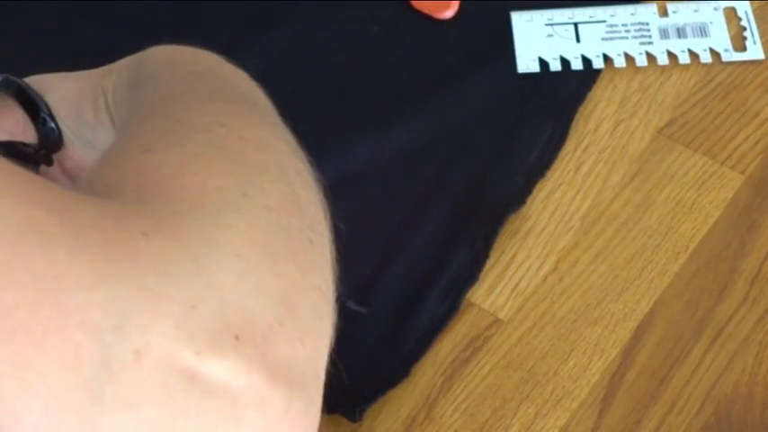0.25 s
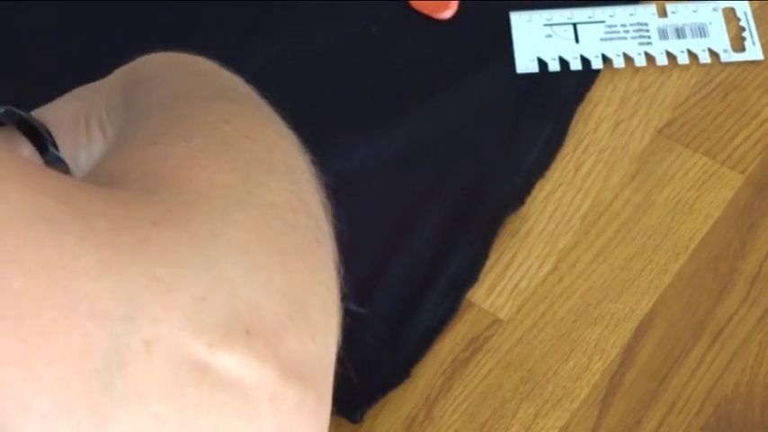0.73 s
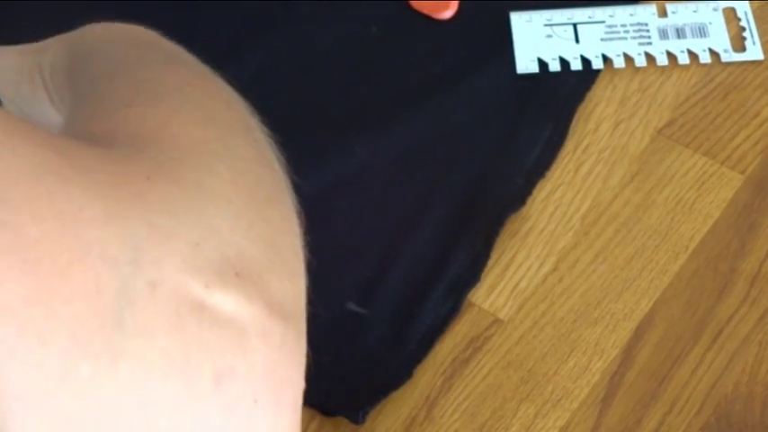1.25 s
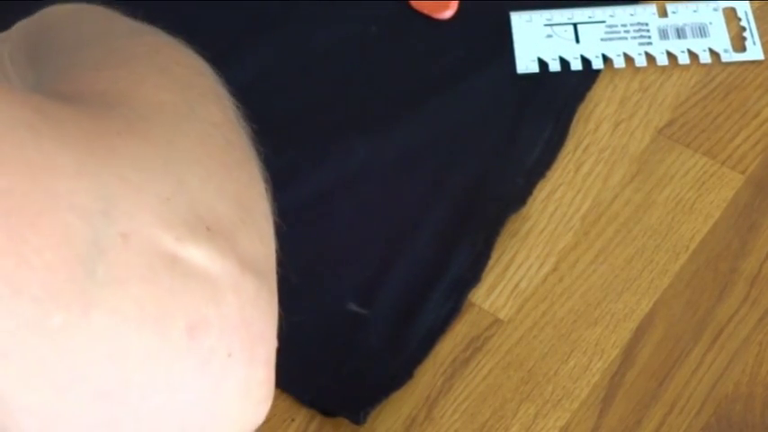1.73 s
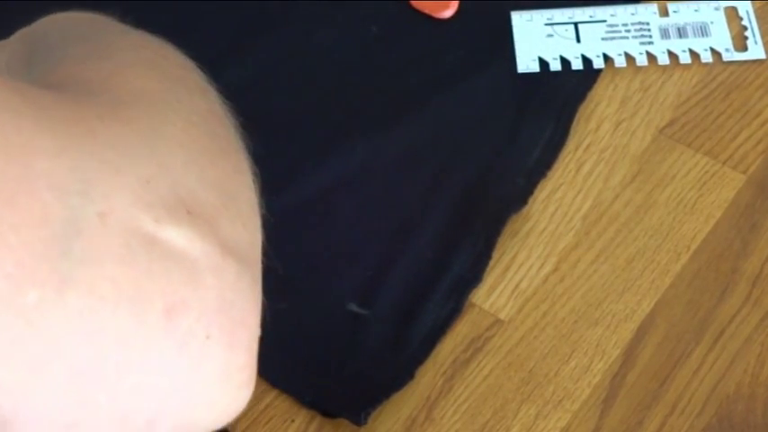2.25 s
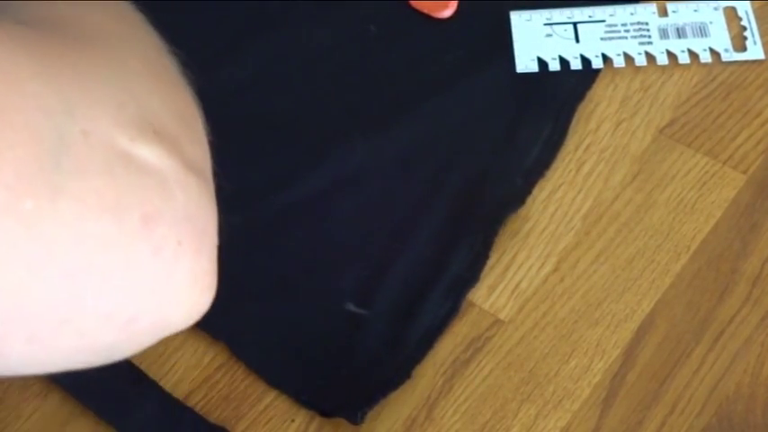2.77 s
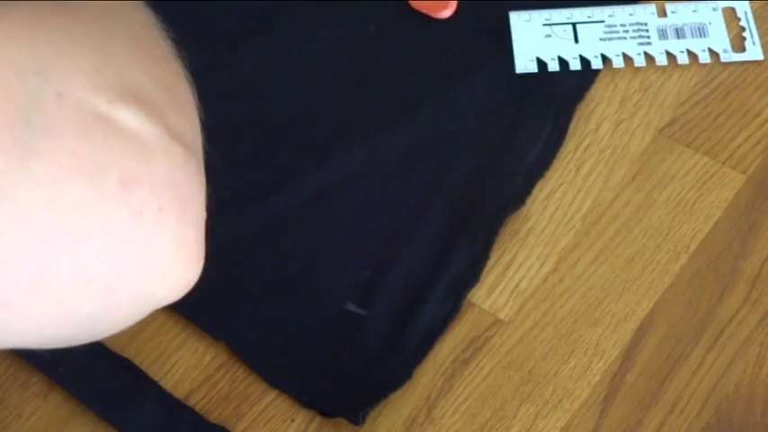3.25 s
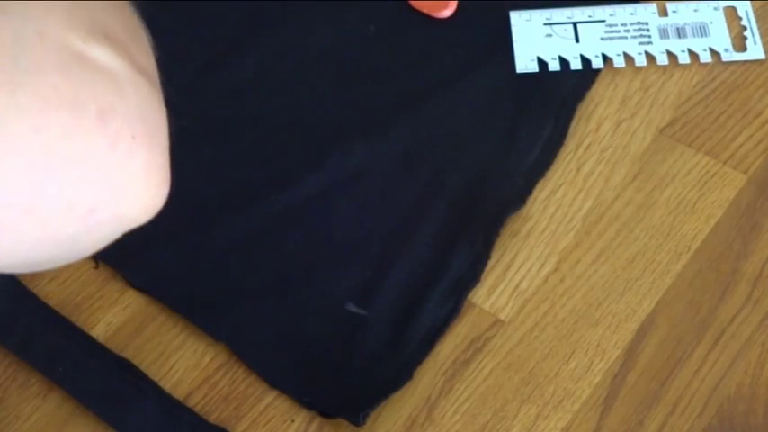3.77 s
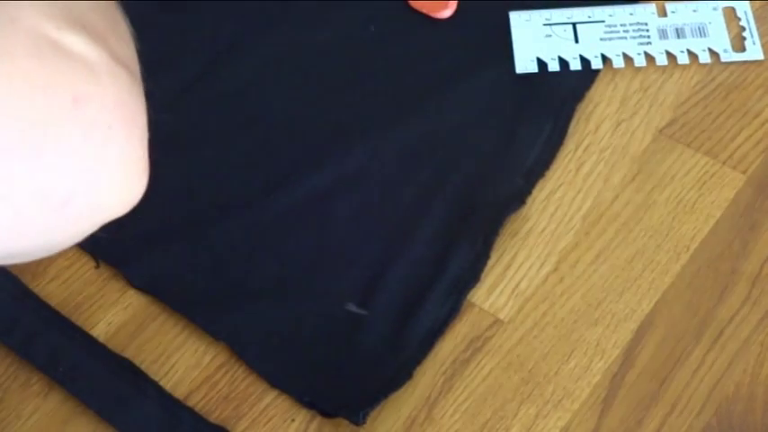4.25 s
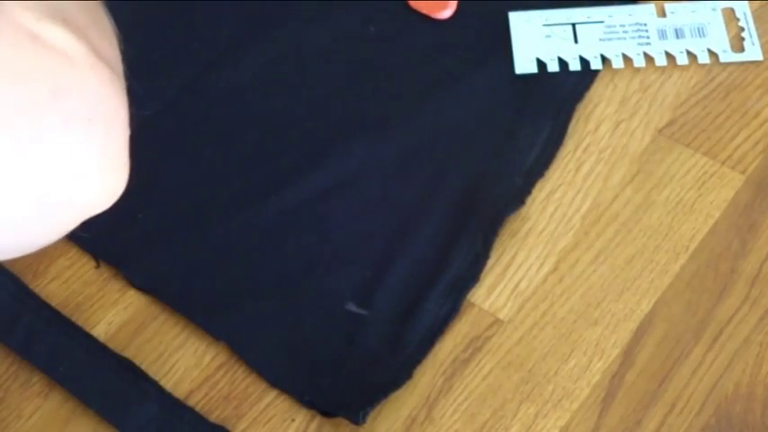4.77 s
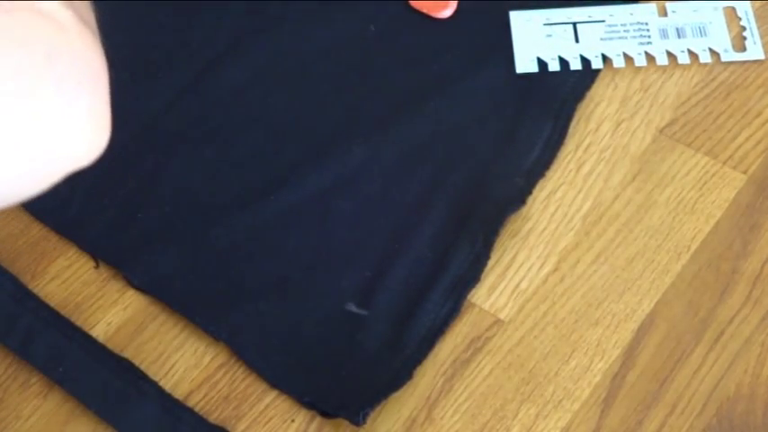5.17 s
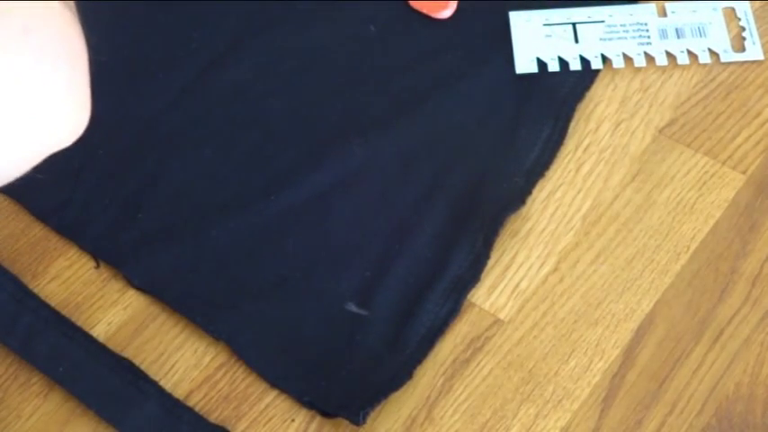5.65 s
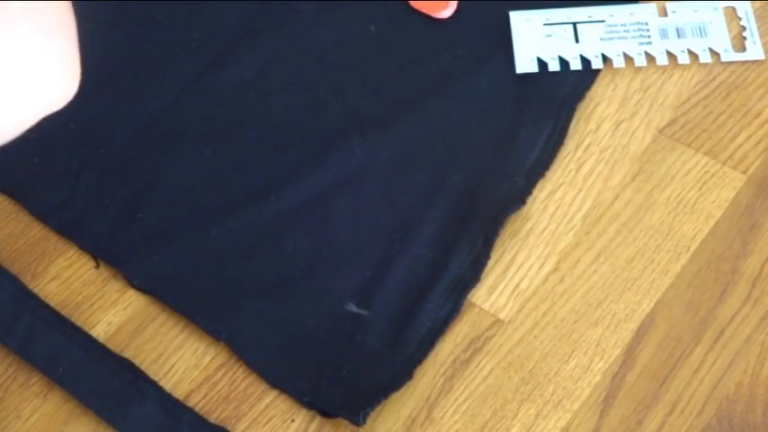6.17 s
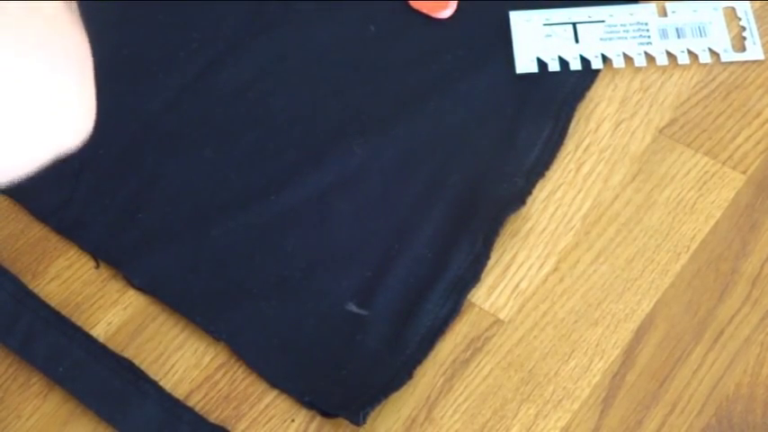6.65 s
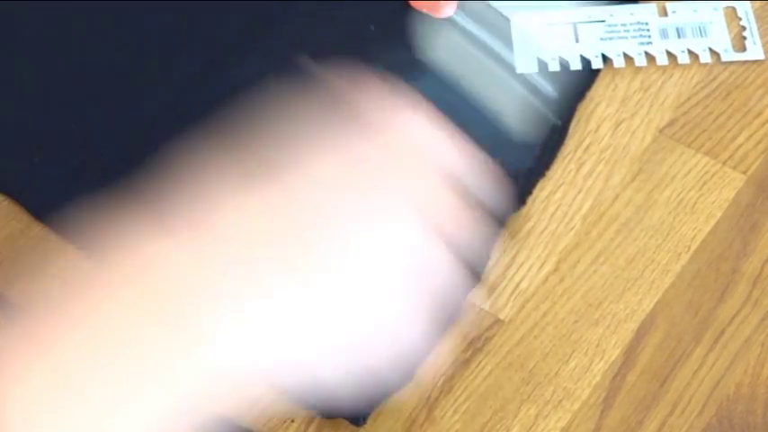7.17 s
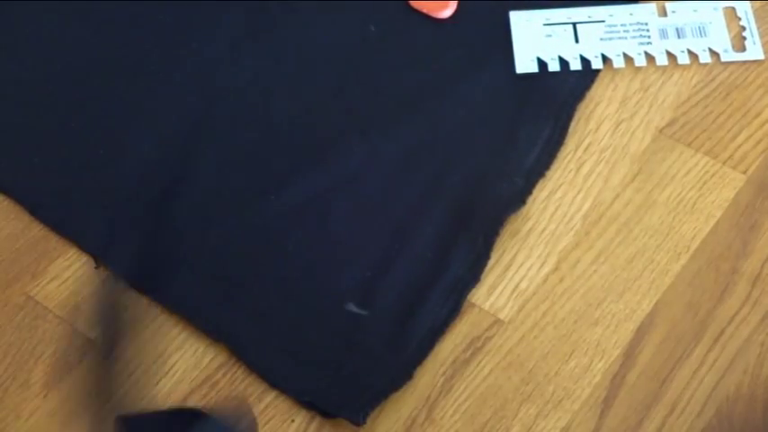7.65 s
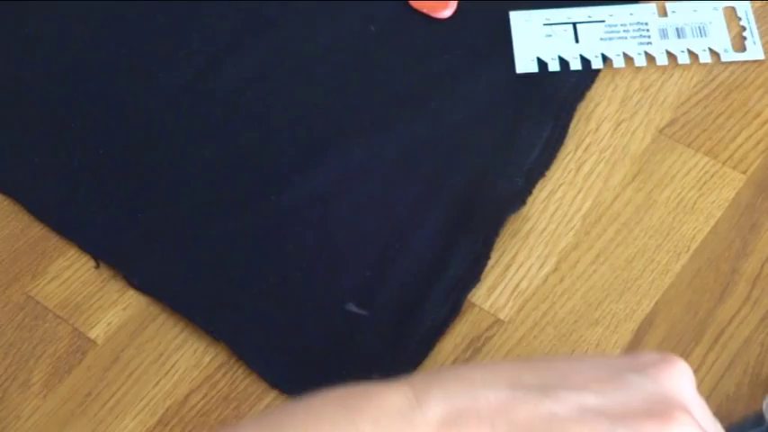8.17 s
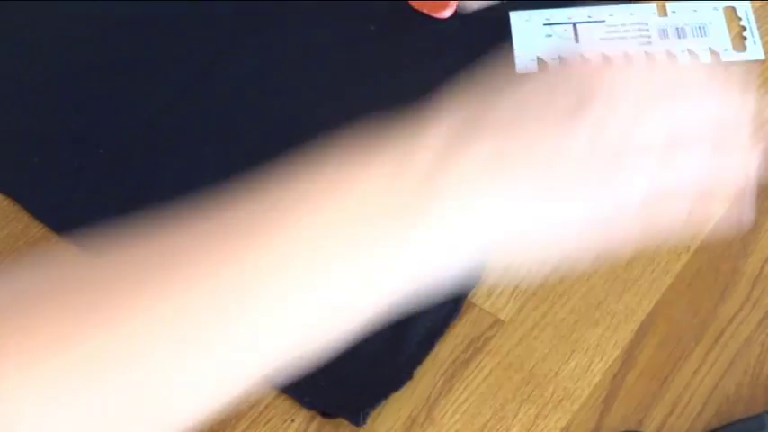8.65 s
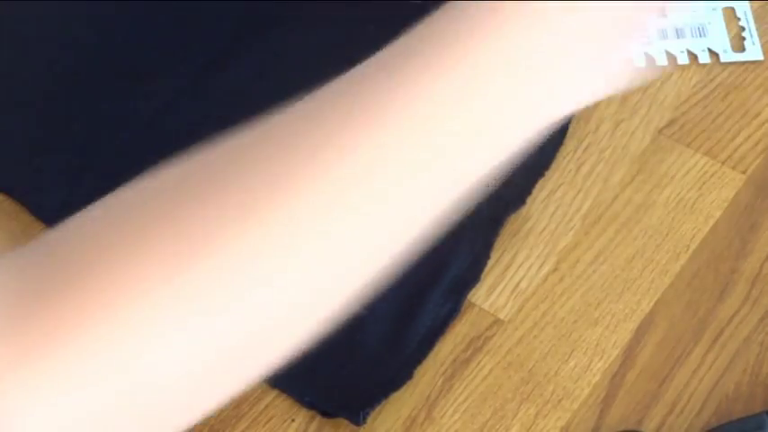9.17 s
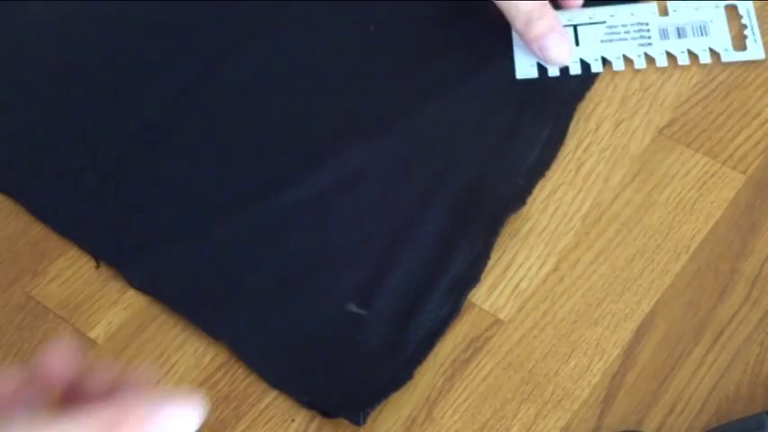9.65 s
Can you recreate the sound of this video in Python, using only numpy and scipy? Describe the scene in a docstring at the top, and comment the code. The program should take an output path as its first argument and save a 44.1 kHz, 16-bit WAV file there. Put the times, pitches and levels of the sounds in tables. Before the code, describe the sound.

A small bare room with short, bright echoes and a faint constant hush, hiss and whirr. Close to the microphone, scissors cut stretchy cloth on a wooden table. Crunching strokes, full of tiny fibre snaps and sliding steely pitches, begin at about 0.4, 1.65, 3.0, 4.2, 5.4 and 6.3 seconds; the first is longest, swelling over 0.4 seconds, the others about 0.2. Thin steel swishes fall between them, with dull wooden knocks and soft cloth fizz. At 6.6 the blades snap shut sharply, and at 6.9 cloth rustles brightly. At 7.5 the scissors clack onto the wood with a short metallic ring, followed by a lighter click and a strong cloth brush around 7.7. Heavier, booming thumps and clatter come at 8.1 and 8.5 to 8.6. A soft hand brush passes near 8.9; a rough, dragging rustle and small dry ticks follow at 9.7 to 9.9.

```python
"""Scissors cut a strip off stretchy cloth on a wooden table, six strokes, in a small bare room.
Each stroke is a swelling crunch: tiny snaps of fibres ring the blades, whose pitches glide as they close.
Between strokes bare edges swish, and throughout, blows knock the wood and cloth fizzes under the hand.
The last cut runs out of cloth and the blades snap shut; cloth rustles brightly. Then the scissors clack
down, things are shifted on the table, a hand brushes the cloth, and a rough, dragging rustle comes among
small ticks near the end. A faint hush, hiss and whirr never stop."""
import sys
import numpy as np
from scipy import signal
from scipy.io import wavfile
from scipy.ndimage import uniform_filter1d

SR = 44100
rng = np.random.default_rng(int(sys.argv[2]) if len(sys.argv) > 2 else 0)


def wrap_up_sound(samples):
    """Save the sound to the file named by the first command line argument, as 16-bit audio."""
    columns = np.atleast_2d(samples).T
    # keep every value between -1 and 1, then stretch to whole-number steps
    tamed = np.clip(columns, -1, 1)
    steps = np.round(tamed * 32767).astype(np.int16)
    wavfile.write(sys.argv[1], SR, steps)


N = 437031  # length [samples]


def amp(db):
    """Turns decibels into a factor on the sound wave."""
    return 10 ** (np.asarray(db) / 20)


def evened(x):
    """Scales a lasting sound to an average (RMS) level of 1."""
    return x / np.sqrt(np.mean(x ** 2) + 1e-20)


def burst(x):
    """Scales a short sound to the energy of 50 ms at full level."""
    return x * np.sqrt(SR / 20 / np.sum(x ** 2))


def read(points, hz):
    """Reads a curve of (frequency, value) points, evenly along musical pitch."""
    f, value = np.transpose(points)
    return np.interp(np.log(hz + 1), np.log(f + 1), value)


def add(mix, s, sound):
    """Lays a sound into the mix, starting at s seconds."""
    part = mix[max(round(s * SR), 0):][:len(sound)]
    part += sound[:len(part)]


def wander(count, size):
    """Smooth chance of unit size that changes over about `size` samples."""
    noise = rng.standard_normal(count)
    return evened(uniform_filter1d(uniform_filter1d(noise, size), size))


def colour(x, spectrum, size=4096):
    """Filters with the given spectrum, never sounding ahead of its input."""
    hz = abs(np.fft.fftfreq(size, 1 / SR))
    log_gain = np.log(amp(read(spectrum, hz)))
    # the Hilbert transform finds the phase that lets the filter respond soonest
    taps = np.fft.ifft(np.exp(np.conj(signal.hilbert(log_gain)))).real
    return signal.oaconvolve(x, taps)[:len(x)]


def resonate(x, hz, width):
    """A resonance of gain 1 that may follow a moving frequency."""
    turn = np.exp(2j * np.pi * np.cumsum(hz * np.ones(len(x))) / SR)
    r = np.exp(-np.pi * width / SR)
    # shift the pitch down to zero, smooth there, and shift it back up
    smooth = signal.lfilter([1 - r], [1, -r], x / turn)
    return 2 * (turn * smooth).real


def ring(modes, build_s=0.009, beating=0.63):
    """The modes of a struck thing build up, beat with their own echoes, and die."""
    t = np.arange(SR) / SR
    out = np.zeros(SR)
    for hz, db, t60 in modes:
        unsteady = 1 + beating * (wander(SR, size=700) + 1j * wander(SR, size=700))
        tone = np.exp(2j * np.pi * (hz * t + rng.random()))
        out += amp(db - 60 * t / t60) * (unsteady * tone).real
    return burst(-np.expm1(-t / build_s) * out)


def grains(per_s, spread_db):
    """A dense train of tiny snaps of uneven size."""
    size = amp(spread_db * np.minimum(rng.exponential(1, N), 4))
    sign = rng.choice([-1, 1], N)
    return evened(size * sign * (rng.random(N) < per_s / SR))


def swells(rows):
    """Level of a row of short rubs, each with its own rise and fall; overlaps add as energy."""
    energy, t = np.zeros(N), np.arange(-SR // 2, SR // 2) / SR
    for s, db, rise, fall in rows:
        shape = amp(2 * db) * np.exp(-(t / np.where(t < 0, rise, fall)) ** 2)
        # leave out what would lie ahead of time zero
        add(energy, s - .5, shape[max(round((.5 - s) * SR), 0):])
    return np.sqrt(energy)


def background():
    """Room hush and microphone hiss are coloured noise; narrow bands of noise make a faint, steady whirr."""
    # spectrum of hush and hiss: (frequency [Hz], relative level [dB])
    hiss = [(20, -25), (45, -8), (110, -2), (220, -0.5), (350, -3.5), (550, -6.5), (900, -9), (1500, -7),
            (2000, -14), (4500, -15.5), (6000, -17.5), (16000, -20)]
    # side against middle: (frequency [Hz], level [dB])
    hiss_width = [(60, -9), (110, -7.5), (200, -1.5), (380, 3.5), (700, 6), (1290, 2), (2380, 2.5),
                  (4400, -5), (8120, -7.5), (15000, -20.5)]
    # bands of the whirr: (frequency [Hz], width [Hz], level before the stereo balance [dB])
    whirr_bands = [(788, 20, -76), (1237, 125, -68), (1502, 140, -69), (3560, 126, -74), (4430, 65, -78.5)]
    hiss_db = -61  # before the stereo balance

    def layer():
        """One stream of hiss and whirr."""
        noise = rng.standard_normal(N)
        whirr = sum(amp(db) * evened(resonate(resonate(noise, hz, width), hz, width))
                    for hz, width, db in whirr_bands)
        return amp(hiss_db) * evened(colour(rng.standard_normal(N), hiss)) + whirr

    mid = amp(-2.0) * layer()
    side = amp(-1.0) * colour(layer(), hiss_width)
    return np.array([mid + side, mid - side]) * amp([[.7], [-.7]])


def room(x, scatter_db=-3, side_db=-9, out_db=-5):
    """Direct sound, a cluster of echoes from table and near walls, then a tail that differs left and right."""
    # distinct first echoes: (delay [s], gain [factor])
    echoes = [(.0043, 0.19), (.0057, 0.29), (.007, -0.43), (.0094, .5), (0.0108, 0.31), (0.0117, -0.2)]
    # how long the tail rings: (frequency [Hz], time to fall by 60 dB [s])
    tail_times = [(120, 0.59), (400, 0.57), (1000, 0.6), (3000, 0.57), (7000, 0.58), (15000, 0.22)]
    # strength of the tail: (frequency [Hz], level [dB])
    wet = [(120, 11.5), (500, 9.2), (1000, 3.5), (3000, 3.7), (7000, 0.76), (14000, 0.4)]
    t = np.arange(SR) / SR
    # random echoes, one row for the middle and one for the side
    taps = rng.choice([-1., 1.], (2, SR)) * (rng.random((2, SR)) < 6000 / SR)
    early = taps * (t > .001) * (t < .013)
    # the tail fades at its own pace in each frequency band
    hz, when, z = signal.stft(taps * (t > .013), SR, nperseg=256)
    t60 = read(tail_times, hz)[:, None]
    fade = amp(read(wet, hz)[:, None] - 60 * when / t60)
    # a longer fade starts softer, so that its length leaves its energy alone
    z = z * fade * np.sqrt(np.log(10 ** 6) / t60 / np.sum(taps[0] ** 2))
    tail = signal.istft(z, SR, nperseg=256)[1][:, :SR]
    mid, side = tail + amp(scatter_db) * early / np.linalg.norm(early[0])
    mid[0] += 1  # direct sound
    for s, gain in echoes:
        add(mid, s, np.array([gain]))
    response = np.array([mid + amp(side_db) * side, mid - amp(side_db) * side])
    return amp(out_db) * signal.oaconvolve(x[None], response, axes=1)[:, :N]


def ticks(cycles=0.48):
    """Dry ticks of a fingernail and a plastic gauge, close by: tones that die within a few cycles."""
    # (time [s], level [dB], centre frequency [Hz])
    tick_rows = [(6.901, -72, 8000), (8.017, -72.5, 9000), (9.6991, -63, 5360), (9.7923, -61.5, 1230),
                 (9.808, -57, 3200), (9.8438, -62, 267)]
    out, t = np.zeros(N), np.arange(SR // 20) / SR
    for s, db, hz in tick_rows:
        tone = np.sin(2 * np.pi * hz * t) * np.exp(-t * hz / cycles)
        add(out, s, amp(db) * burst(tone))
    return out


def rustling():
    """Cloth slips under the hand: a soft fizz of many tiny grains on skin and wood."""
    # (time [s], level before the room [dB], length: rise plus fall [s])
    rubs = [(.01, -56.5, 0.059), (2.143, -59.5, 0.17), (4.68, -64, 0.12), (6.815, -58.5, .016),
            (7.007, -63.5, .095), (7.27, -61, 0.063), (7.706, -45.5, 0.055), (7.82, -55, 0.15),
            (8.942, -55, 0.081), (9.702, -47, 0.0083), (9.85, -55, 0.11)]
    # spectrum of the fizz: (frequency [Hz], relative level [dB])
    cloth = [(200, 4), (1500, 3.5), (4000, 7.5), (7000, 3), (10000, 3), (16000, -1.5)]
    rise_share = 0.52
    level = swells([(s, db, length * rise_share, length * (1 - rise_share)) for s, db, length in rubs])
    return level * evened(colour(grains(per_s=11000, spread_db=3.0), cloth))


def booming():
    """Heavy blows set the whole table top booming in its low modes."""
    # (time [s], level [dB])
    boom_rows = [(7.503, -39), (8.144, -33.5), (8.485, -27.5)]
    # modes of the table top: (frequency [Hz], relative level [dB], time to fall by 60 dB [s])
    table_modes = [(74.5, -26, 0.67), (128.5, 0.5, 0.65), (141.4, -6, 0.54), (156.4, -6, 0.35),
                   (206.7, -2, 0.53), (288.4, -6, 0.44), (333.4, -6, 0.46), (512, -3, 0.41)]
    out = np.zeros(N)
    for s, db in boom_rows:
        add(out, s, amp(db) * ring(table_modes))
    return out


def table(contacts, drag_db=-2, thump_db=-2, lowest_hz=80, touch_db=-3.0, grip_s=0.0018):
    """Each contact is a push and a stutter of slips, sounding the dull and the hard noise of the wood."""
    # spectra of the low thump, the knock and the hard crack: (frequency [Hz], relative level [dB])
    thump_spectrum = [(50, -19), (80, -24), (110, -24), (140, -4.5), (180, -7.5), (280, 1.5), (380, -4.5),
                      (800, -51.5)]
    knock_spectrum = [(100, -31), (200, -8), (300, 5), (390, -2.5), (510, 1.5), (800, 1.5), (1100, -13),
                      (1600, -20.5), (3000, -33.5), (8000, -90)]
    crack_spectrum = [(300, -53), (1000, 3.5), (1800, 10.5), (2800, 2), (3800, -10.5), (6000, -16.5),
                      (9000, -30.5), (16000, -42)]
    knock, thump, crack = np.zeros((3, N))
    t = np.arange(SR // 5) / SR
    slips = grains(per_s=1500, spread_db=3)[:len(contacts) * len(t)].reshape(len(contacts), -1)
    touch = amp(touch_db) * burst(signal.unit_impulse(len(t)))
    for (s, knock_db, low_db, crack_db, drag), stutter in zip(contacts, slips):
        dragging = stutter * -np.expm1(-t / grip_s) * np.exp(-t / drag)
        push = amp(drag_db) * burst(dragging) + touch
        push /= np.linalg.norm(push)
        add(knock, s, amp(knock_db) * push)
        add(thump, s, amp(low_db + thump_db) * push)
        add(crack, s, amp(crack_db) * push)
    click = signal.unit_impulse(SR // 10)
    parts = ((knock, knock_spectrum), (thump, thump_spectrum), (crack, crack_spectrum))
    wood = sum(signal.oaconvolve(x, burst(colour(click, spectrum)))[:N] for x, spectrum in parts)
    # the knocks carry no deep bass
    return signal.sosfilt(signal.butter(2, lowest_hz, "high", fs=SR, output="sos"), wood)


def clacks():
    """Steel strikes the wood: a sharp click of steel, and the ring of scissors and board."""
    # (time [s], click level before the room [dB], ring level before mixing [dB])
    strikes = [(7.5013, -30.5, -28), (7.512, -39.5, -28.5), (7.6678, -33.5, -47), (8.188, -52, -37.5),
               (8.474, -39, -36), (8.534, -48, -32.5)]
    # modes of scissors and board: (frequency [Hz], relative level [dB], time to fall by 60 dB [s])
    clack_modes = [(485, -19, 0.33), (724, -11, 0.24), (836, -3, 0.77), (914, 1, 0.53), (957, -7, 0.59),
                   (1022, -3.5, 0.86), (1644, -1.5, 0.29), (1964, -3.5, 0.33), (2790, -3, 0.23),
                   (2970, -2, 0.23), (3280, 4, 0.11), (3730, -13, 0.18), (5399, -21, 0.098)]
    # spectrum of the click: (frequency [Hz], relative level [dB])
    steel = [(500, -16), (2500, 8), (4300, 2.5), (7000, -7.5), (10000, -10.5), (16000, -18)]
    clicks, rings = np.zeros((2, N))
    click = burst(colour(signal.unit_impulse(SR // 10), steel))
    for s, db, ring_db in strikes:
        add(clicks, s, amp(db) * click)
        add(rings, s, amp(ring_db) * ring(clack_modes))
    return clicks, rings


def sliding(db=-1, ring_db=-4):
    """Bare steel edges scrape and ring the free blades; one bright rustle of cloth is made the same way."""
    # steel swishes with no cloth between, and at 6.913 s a bright rustle of cloth:
    # (time [s], level before scrape and ring are weighed [dB])
    bright_rubs = [(1.04, -39.5), (2.373, -40.5), (3.413, -45.5), (4.606, -53.5), (4.824, -46.5),
                   (5.888, -44.5), (6.913, -47.5)]
    # spectrum of the scrape: (frequency [Hz], relative level [dB])
    scrape_spectrum = [(300, -71), (1500, -21), (3000, -32), (4200, -20), (5200, 5.5), (6200, 8), (7500, 4),
                       (9500, 8), (12300, 7.5), (13500, 4), (14700, 9.5), (16000, 4.5)]
    # resonances of the free blades: (frequency [Hz], width [Hz], relative level [dB])
    blade_free = [(1510, 120, -5), (3920, 95, 10), (4550, 420, 6.5), (6020, 520, 9), (7050, 500, 6.5),
                  (9070, 940, 7), (12260, 190, 15)]
    rise_s, fall_s = 0.0075, 0.01
    # the last cut runs out of cloth and the blades snap shut: time, level, rise, fall
    snap = (6.584, -25, 0.0028, 0.0022)
    scrape = grains(per_s=9000, spread_db=2.5)
    steel = evened(sum(amp(mode_db) * resonate(scrape, hz, width) for hz, width, mode_db in blade_free))
    level = swells([(s, rub_db, rise_s, fall_s) for s, rub_db in bright_rubs] + [snap])
    return level * (amp(db) * evened(colour(scrape, scrape_spectrum)) + amp(ring_db) * steel)


def squeeze(t, start, stop, peak_share, swell_db, ease_db=11):
    """Force of the hand in dB: it grows to a peak, then eases."""
    done = (t - start) / (stop - start)
    return np.interp(done, [0, np.clip(peak_share, .05, .95), 1], [-swell_db, 0, -ease_db])


def blades(snaps, closure, modes):
    """Each resonance glides from its open to its shut pitch and strength."""
    closure = np.clip(closure, 0, 1)
    out = np.zeros(len(snaps))
    for open_hz, shut_hz, width, open_db, shut_db in modes:
        hz = open_hz + (shut_hz - open_hz) * closure
        out += amp(open_db + (shut_db - open_db) * closure) * resonate(snaps, hz, width)
    return evened(out)


def cutting(crunch_db=-5.5, rasp_db=-5.0, fibre_db=-13, bite_db=3.0, nip_db=3, bite_rasp_db=-13,
            flutter_db=4.0, lurch=0.14):
    """Fibres snap between the edges and ring the blades, whose resonances shift as they close."""
    # one row a cut; the levels are weighed again below: (edges meet [s], blades stop [s],
    # crunch of the fibres [dB], rasp of the edges [dB], hardest squeeze at [share of the cut],
    # swell up to it [dB], last nip [dB])
    strokes = [(0.421, 0.813, -39, -54.5, 0.8, 27, -33.5), (1.654, 1.861, -38, -52, 0.67, 11, -38.5),
               (2.966, 3.202, -41.5, -54.5, .58, 8, -48), (4.2, 4.426, -40.5, -54.5, .57, 8, -39),
               (5.398, 5.637, -42, -51, 0.81, 12, -34), (6.325, 6.499, -40, -56, 0.66, 17, -37)]
    # ring of the blades, low and high, as the crossing point runs from pivot to tip: (open [Hz],
    # shut [Hz], width [Hz], relative level open [dB], relative level shut [dB])
    blade_low = [(2600, 2510, 92, -8, 16), (4270, 3960, 160, 7, 2), (4530, 4650, 230, 6.5, 4),
                 (5270, 4870, 170, -3, 5), (6170, 6200, 120, 14, -1), (7000, 6800, 260, 2, -1)]
    blade_high = [(8260, 9900, 250, 10, 2.6), (10750, 11200, 210, 9.2, 8.8), (12250, 12640, 280, 3, 15.7),
                  (11200, 12500, 290, 4, 7), (13200, 14400, 240, 2.4, 7.2)]
    # spectrum of the snapping fibres: (frequency [Hz], relative level [dB])
    fibre = [(500, -64), (2000, -20), (5000, -1), (8000, -7), (12000, 2), (16000, -15)]
    # the rasp fades as the crossing nears the tips; all contact dies once the blades stop
    attack_s, rasp_fade_db, after_stop_db, release_db_per_s = .008, 0.5, 14, 130
    # the knit gives way one bunch of threads after another, evenly up to the last nip
    bite_every_s, bite_jitter_s, bite_spread_db = 0.0346, 0.00097, 2.5
    bite_rise_s, bite_fall_s, nip_rise_s, nip_fall_s = 0.0041, 0.0031, 0.0017, 0.0024
    settle_s = 0.058  # the blades still creep this long after the last nip
    out = np.zeros(N)
    snaps = grains(per_s=4500, spread_db=3.2)
    fibres = evened(colour(snaps, fibre))
    for start, stop, crunch, rasp, peak_share, swell_db, nip in strokes:
        at = np.arange(int(start * SR), int(stop * SR) + SR // 8)
        t = at / SR
        done = np.minimum((t - start) / (stop - start), 1)

        # contact of the edges: quick onset, flutter, and release
        release_db = np.where(t > stop, after_stop_db + release_db_per_s * (t - stop), 0)
        contact = np.minimum((t - start) / attack_s, 1) * amp(-release_db)
        contact *= amp(flutter_db * wander(len(at), size=350))

        # bites, counted back from the stop, and the last nip
        late, strong = rng.standard_normal((2, 20))
        times = stop - bite_every_s * np.arange(1, 21) + bite_jitter_s * late
        force_db = squeeze(times, start, stop, peak_share, swell_db)
        levels = crunch + bite_db + force_db + bite_spread_db * strong
        rows = [(s, db, bite_rise_s, bite_fall_s) for s, db in zip(times, levels) if s > start]
        bites = swells(rows + [(stop, nip + nip_db, nip_rise_s, nip_fall_s)])[at]

        # the blades close unevenly, in small lurches
        closure = (t - start) / (stop - start + settle_s) + lurch * wander(len(at), size=700)
        low = blades(snaps[at], closure, blade_low)
        high = blades(snaps[at], closure, blade_high)
        crunch_level = amp(crunch + crunch_db + squeeze(t, start, stop, peak_share, swell_db))
        high_level = np.hypot(crunch_level * contact, bites)
        rasp_level = amp(rasp + rasp_db - rasp_fade_db * done)
        low_level = np.hypot(rasp_level * contact, amp(bite_rasp_db) * bites)
        out[at] += high_level * (high + amp(fibre_db) * fibres[at]) + low_level * low
    return out


def scene():
    """Everything sounds on the table; contacts land on different spots, each with its own echoes."""
    # blows on the table; the row at 9.806 s is a rough, dragging rustle. Levels are those before
    # the room and the thump's own setting: (time [s], knock [dB], low thump [dB], hard crack [dB],
    # time the thing drags on [s])
    contacts = [(.151, -50, -43.5, -56, 0.0058), (.485, -49.5, -50.5, -63, .006),
                (1.714, -39, -59, -40, 0.0026), (1.742, -31.5, -41.5, -36.5, 0.045),
                (1.862, -41, -47, -46, 0.0044), (2.849, -36, -46, -42, 0.0053),
                (2.93, -39, -47, -37, 0.0025), (4.193, -46.5, -56, -56, 0.0058),
                (4.226, -38, -42, -39, 0.006), (4.387, -42, -48, -52, 0.0029),
                (5.006, -32, -43, -46.5, .005), (6.197, -45.5, -44.5, -69, 0.0043),
                (6.259, -46, -64, -70, 0.14), (6.336, -44.5, -48.5, -76, 0.023),
                (7.501, -34.5, -30.5, -30, 0.0082), (7.666, -39.5, -60, -39, 0.0036),
                (7.697, -57, -43, -37.5, 0.058), (7.838, -39, -36.5, -46, 0.036),
                (7.982, -37.5, -34.5, -40, 0.0076), (8.145, -28.5, -25.5, -40, 0.0044),
                (8.188, -34.5, -37, -30, 0.0015), (8.476, -32, -30, -28, 0.024),
                (8.534, -28.5, -33.5, -29.5, 0.015), (8.606, -33, -31.5, -42, 0.015),
                (9.806, -52.5, -50, -49, 0.08)]
    clicks, rings = clacks()
    near = ticks()
    handwork = cutting() + sliding() + rustling() + clicks + near
    scissors = room(handwork, scatter_db=-1.5, side_db=-14.0, out_db=-8.0)
    spots = 3  # the contacts take turns between them
    on_table = sum(room(table(contacts[k::spots]), scatter_db=-2, side_db=-10.5, out_db=-11.5)
                   for k in range(spots))
    # the scissors sit slightly to the left; ticks are also heard directly
    return scissors * amp([[.3], [-.3]]) + on_table + booming() + amp(-6.5) * rings + near + background()


def record(dry):
    """The recorder's band limit: a steep filter takes away the highest treble."""
    edge_hz = 16050
    low_pass = signal.firwin(511, edge_hz, window=("kaiser", 9), fs=SR)
    return signal.oaconvolve(dry, low_pass[None], "same")


dry = scene()
out = record(dry)
wrap_up_sound(out)
```